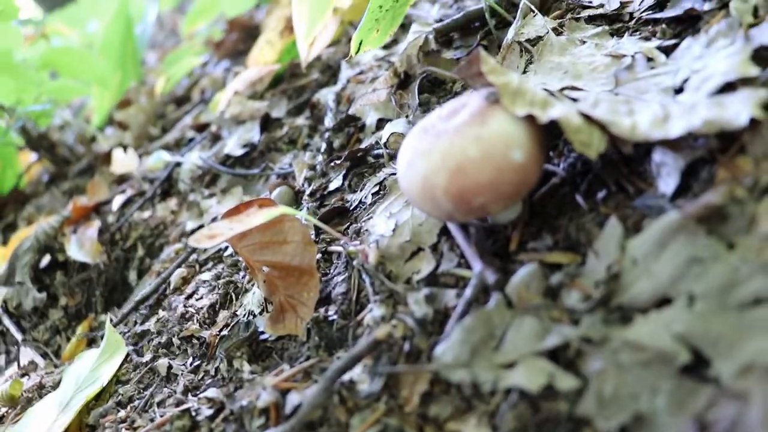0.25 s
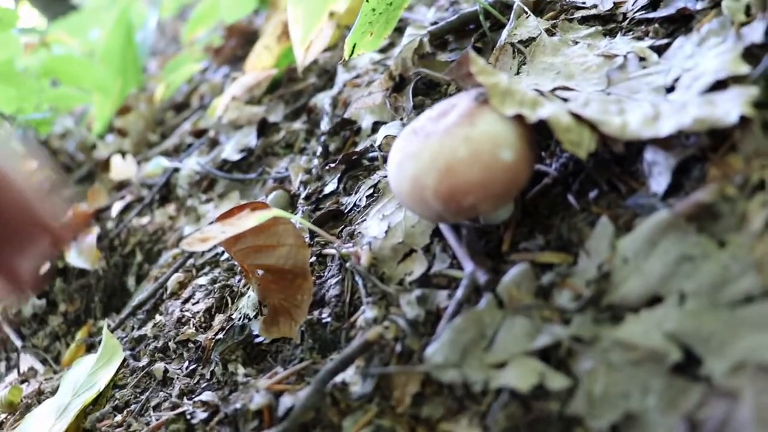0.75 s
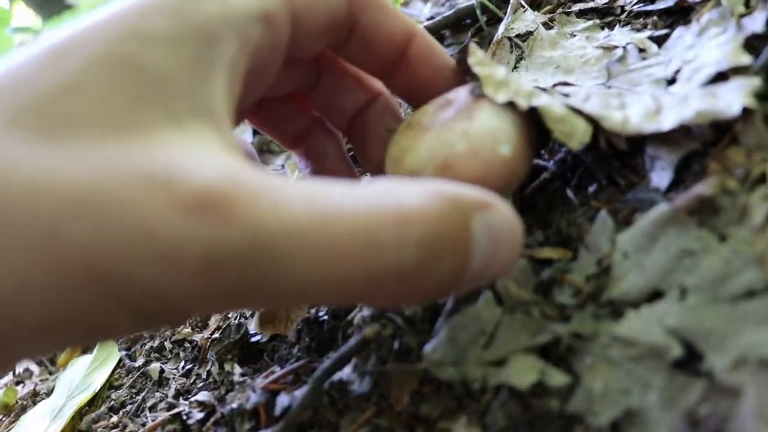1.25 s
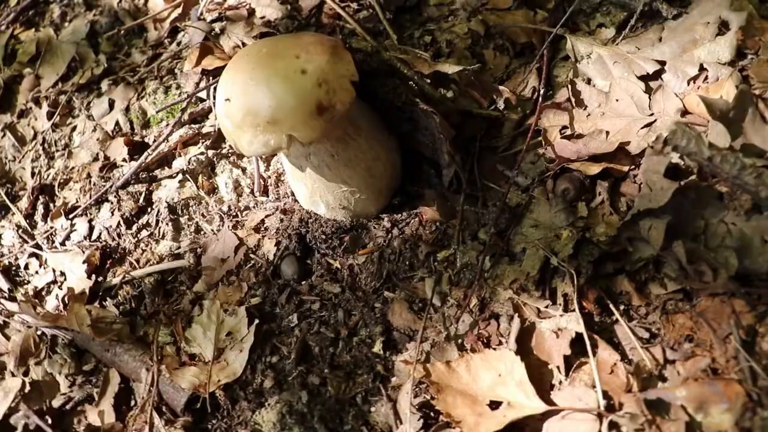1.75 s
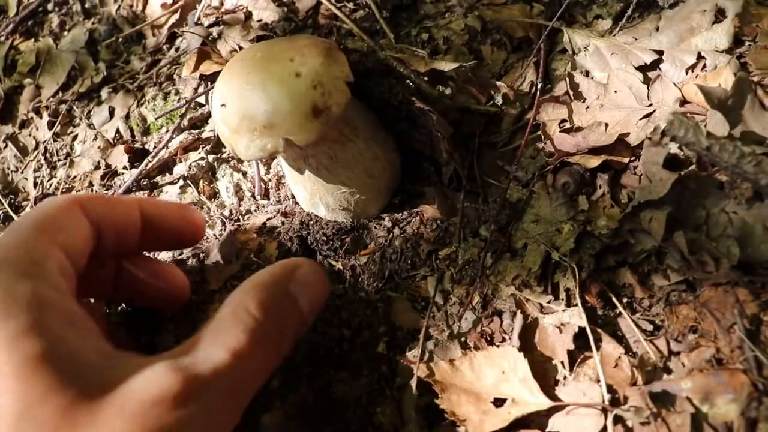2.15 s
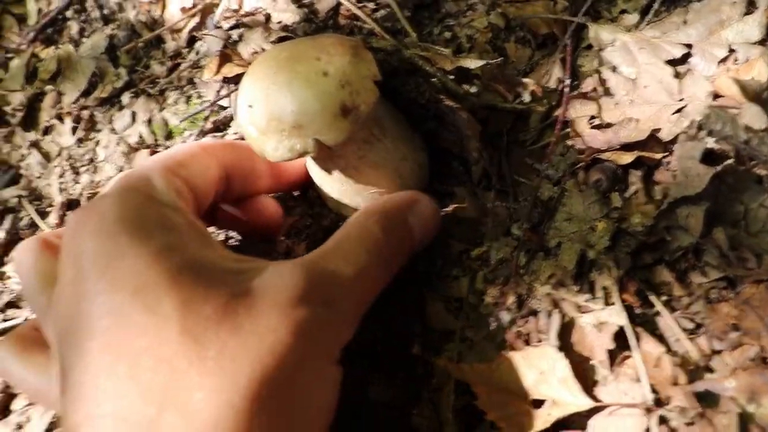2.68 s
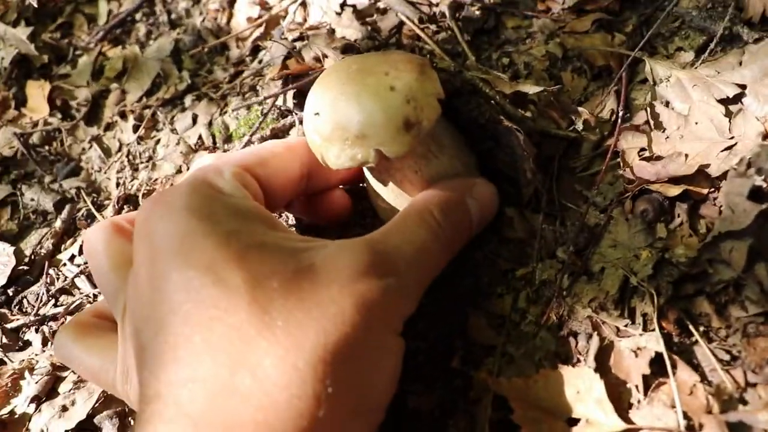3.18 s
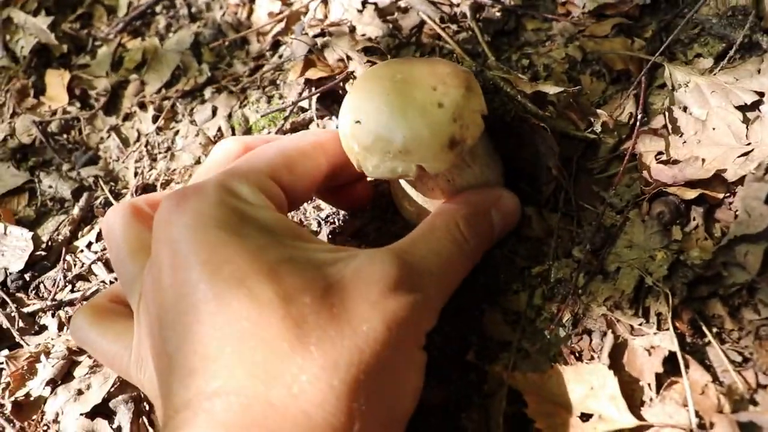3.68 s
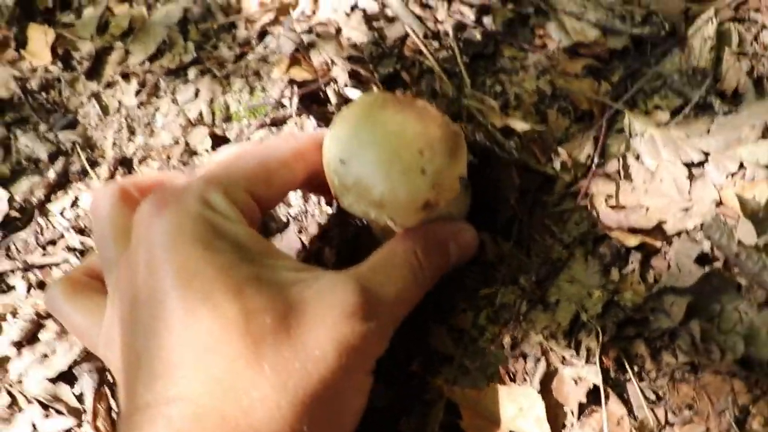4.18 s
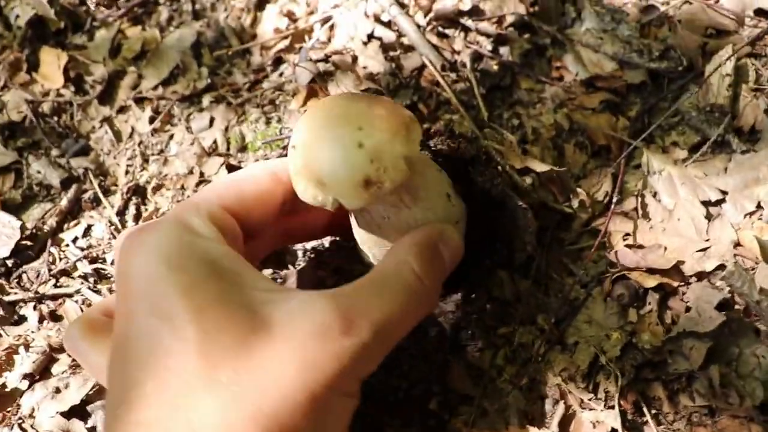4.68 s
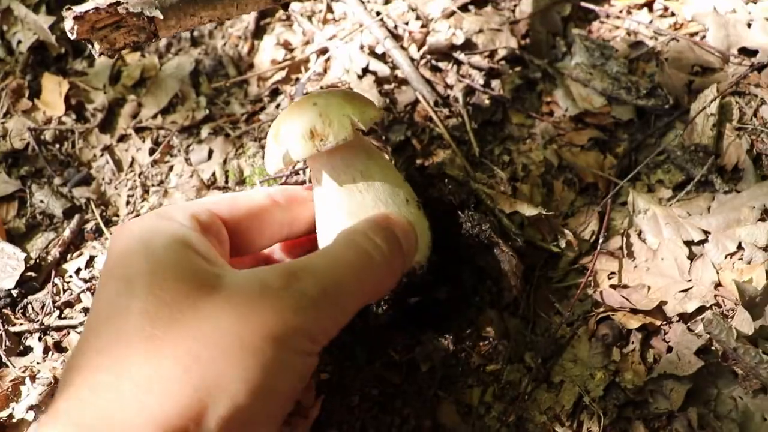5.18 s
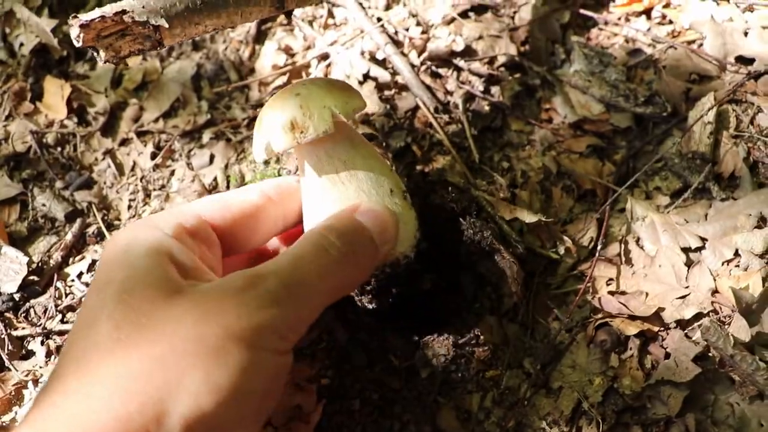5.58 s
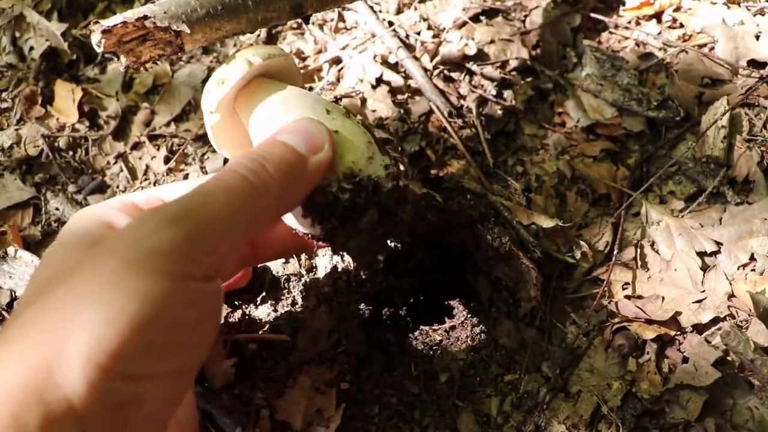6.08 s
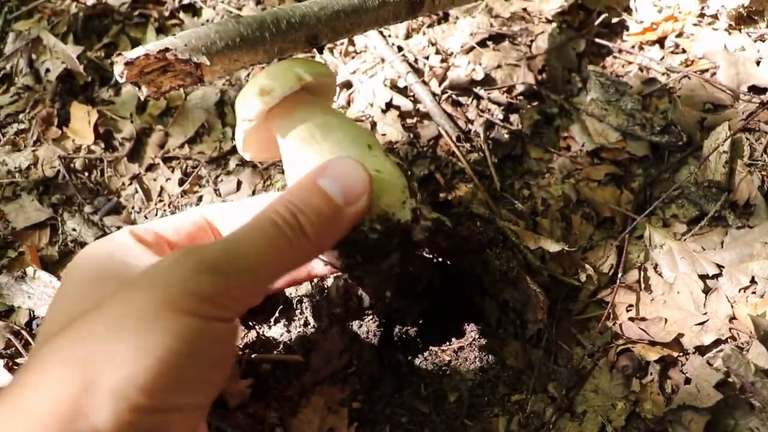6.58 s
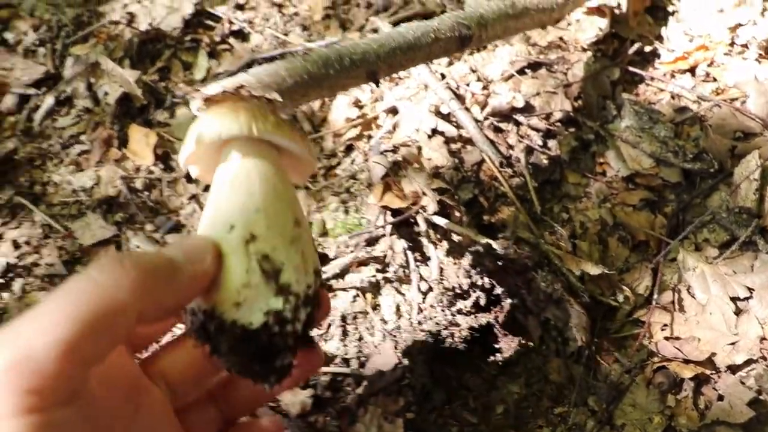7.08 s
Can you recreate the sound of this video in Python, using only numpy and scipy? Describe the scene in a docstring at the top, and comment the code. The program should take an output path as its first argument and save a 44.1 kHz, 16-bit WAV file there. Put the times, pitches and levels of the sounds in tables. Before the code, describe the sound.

Dry leaves and small twigs crackle unevenly, close to a stereo microphone, as fingers work a mushroom out of the forest floor. Bright snaps come singly and in clusters, mixed with crinkling, short leaf scrapes and muffled taps of crumbling soil. The handling grows lighter toward the end. Underneath lie steady, soft woodland air and a faint low rumble.

```python
"""Dry leaves and twigs crack one by one as a hand digs into the litter and pulls up a mushroom, close by.
Each crack is a spray of tiny fractures: a bright snap, a lower ring and a little body. The fingers drag
up a dense crinkle, leaves slide with a hiss and stop short, soil and stem knock dully.
Behind it lie a low rumble, a quiet wood and the hiss of the stereo microphones."""
import sys
import numpy as np
from scipy import signal
from scipy.fft import rfft, irfft
from scipy.io import wavfile
from scipy.ndimage import uniform_filter1d

SR = 44100
rng = np.random.default_rng(int(sys.argv[2]) if len(sys.argv) > 2 else 0)


def bounce(signal):
    """Save signal as a 16-bit WAV file at the path given by the first command-line argument."""
    frames = np.transpose(np.atleast_2d(signal))
    limited = np.clip(frames, -1, 1)
    pcm = np.round(limited * 32767).astype(np.int16)
    wavfile.write(sys.argv[1], SR, pcm)


N = 323694

# how hard the fingers drag: t/s, dry leaves/dB, damp soil/dB, pan (left minus right)/dB
FINGER_DRAG = [(0.0, -50.5, -47, 2), (0.18, -52.5, -52.5, 5), (0.39, -55.5, -62, -2), (0.57, -54, -53.5, 4),
               (0.71, -49.5, -51.5, -3), (0.88, -56.5, -56, 3), (1.1, -58, -58, 1), (1.59, -48.5, -60, -3),
               (1.84, -54.5, -53, 0.1), (2.08, -56, -52.5, -0.5), (2.47, -49, -52, -1.2),
               (2.88, -56, -52, -2.5), (3.07, -53.5, -51.5, -3), (3.43, -59, -59.5, 0.1),
               (3.72, -57, -54, -3), (3.93, -56, -52.5, -3), (4.09, -59, -60, 0.1), (4.7, -52, -56.5, -1),
               (5.36, -61.5, -63.5, -1), (5.56, -61, -69, -2), (5.74, -55, -60.5, 1),
               (6.19, -60, -63.5, -2), (6.52, -57, -59, -2), (6.77, -58, -58.5, -1),
               (6.95, -62.5, -65, 0.1), (7.34, -63, -60, 0.1)]


def cracks(snap_hz=9130, snap_scatter=0.06):
    """A leaf splits in a spray of tiny fractures: a bright snap, a lower ring and a little body."""
    # t/s, snap peak/dB, ring re snap/dB, ring f/Hz, body re snap/dB, spray time scale/ms, pan/dB
    loud_cracks = [(0.1111, -13, -6.5, 3440, -25, 0.42, 8), (0.1198, -15.5, -13.5, 3560, -14, 1.9, 2),
                   (0.137, -31, 6, 4150, 0, 7.1, -5), (0.3083, -35, -1, 3240, -9, 2.3, 8),
                   (0.3676, -25, -8, 3470, -14, 2.1, 3.5), (0.411, -12.5, 0.5, 4390, -11.5, 1.26, 4),
                   (0.508, -17, -12, 3170, -20, 1.3, 8), (0.6618, -23, -8, 3500, -24, 1.8, 7),
                   (0.6827, -23, -20.5, 4470, -18, 3.4, 7), (0.6929, -30, -20, 4580, -22, 4.2, -1),
                   (0.7386, -23.5, -21, 4620, -34, 6.5, 6.5), (0.8005, -23, -14.5, 3720, -31, 2.6, 8),
                   (0.8466, -24.5, -3.5, 4140, -12.5, 1.5, 6.5), (0.982, -29, 6, 3160, -10, .84, 8),
                   (1.0913, -16.5, -9.5, 3650, -28, 1.84, 7.5), (1.2141, -35, -11, 3100, -22, 3.1, 4.5),
                   (1.269, -29, -12, 3490, -17, 0.74, -12), (1.3292, -18.5, -18, 3180, -28, 2.5, -5.5),
                   (1.35, -30, -3, 2860, -18, 1.9, -9), (1.384, -28.5, -6.5, 4520, -18, 4.1, 1),
                   (1.393, -26, -11, 4230, -11, 1.4, -6), (1.4347, -27.5, -25, 3940, -22, 7.3, -1),
                   (1.442, -27.5, -7, 5000, -10, 7.3, 2.5), (1.7507, -24.5, -13, 3800, -26, 7.1, -6),
                   (1.804, -25.5, -8.5, 3250, -14, 7.3, -3), (1.9259, -29, -20, 4290, -8, .6, 3),
                   (2.06, -30, -6, 4820, -7.5, 1.8, -1), (2.0005, -35, -9, 4850, -19.5, 1.1, 6),
                   (2.1138, -31, -7, 4830, -12, 1.8, 4), (2.257, -21, -12, 4540, -12, 1.7, 4),
                   (2.2657, -25.5, 0, 4030, -7, 1.2, 1), (2.296, -17, 0.5, 4580, -14, 0.87, 1),
                   (2.312, -26, -3, 2190, -27, 1.6, -1.5), (2.3464, -31, -21, 3070, -23, .9, 2),
                   (2.3701, -24.5, -9, 2520, -32, 0.24, 2), (2.3956, -21.5, -16, 2050, -19, .73, 4),
                   (2.4464, -26.5, -25, 3130, -13, 1.7, 5.5), (2.529, -29, -23, 2130, -15, 4.9, 6),
                   (2.5935, -22, -17, 2630, -5, 1.3, -2), (2.628, -14.5, -19, 3020, -20, 0.18, 10),
                   (2.836, -27, -16, 2580, -23, 1.1, 7.5), (2.8815, -17.5, -23, 2760, -15, 0.43, 7),
                   (2.8661, -30, -16, 2810, -20, .6, 7.5), (2.8907, -21, -7, 3410, -10, 0.36, 1),
                   (2.8982, -12, -8.5, 2980, -3.5, 0.45, 1), (2.9068, -21, -14, 2600, -25, 1.5, 6),
                   (2.91, -15.5, -16, 2310, -34, 0.78, 3.5), (2.9784, -15.5, -7.5, 2160, -30, 0.34, 6.5),
                   (3.045, -29, -19, 3050, -10, 0.41, 7), (3.1403, -25, 0.5, 2780, -4, 1, 2),
                   (3.1479, -15.5, -8.5, 2650, -13.5, 2.44, -2), (3.1504, -24.5, -8, 4400, -9, 14, -1),
                   (3.1706, -18.5, -6, 3950, -10, .38, -0.5), (3.2226, -26, -5.5, 3800, -11, 1.8, -1),
                   (3.2337, -23, -24, 3470, -12.5, 0.5, -0.5), (3.2586, -29.5, -25, 3430, -14, 0.44, 11.5),
                   (3.402, -36, -21, 2340, -13, 0.36, -4), (3.551, -26, -2, 2400, -7, 0.42, 1.5),
                   (3.667, -24.5, -15, 2010, -25, 1.1, 8), (3.7872, -28.5, -4.5, 2930, -4, 0.78, 2),
                   (3.8927, -20.5, -1.5, 3120, -2, 0.87, -2.5), (4.0263, -29, -5, 2400, -1.5, 1.9, -2.5),
                   (4.0464, -19.5, 0, 2660, -14, 0.18, -2.5), (4.0767, -27, -8.5, 1870, -12, 1.3, -1.5),
                   (4.3014, -29, -6, 3260, -8, 0.98, 12.5), (4.3793, -28.5, -2.5, 2680, -15, 1.3, 0),
                   (4.4525, -26.5, -32, 3350, -25, 0.37, 10), (4.4932, -25, -23, 2600, -16, .28, 8),
                   (4.5063, -27.5, -26, 4500, -19, .4, -2), (4.5649, -28, -20, 3760, -25, .26, 10),
                   (4.5816, -21, -27, 4100, -11.5, 0.49, 6.5), (4.5995, -27, -17, 2270, -23, .4, 5.5),
                   (4.6306, -21.5, -2.5, 3360, -15, 0.42, -1), (4.6572, -24, -8, 2800, -12, 0.88, 3),
                   (4.809, -25, -18, 4400, -12, 5.5, 10), (4.8244, -25, -4, 3720, -4, 0.39, -9),
                   (4.8439, -29, 0, 2110, -6, 0.4, 1), (4.894, -26, -11, 3350, -26.5, .44, -5),
                   (4.9172, -36, -20, 3110, -27, .58, 8), (4.992, -20.5, -4, 3300, -2.5, 2.4, -4.5),
                   (5.0644, -25.5, -14.5, 4370, -21, 0.74, 3), (5.1466, -35.5, -1, 2670, -0.5, 2.8, 2),
                   (5.1787, -25.5, -3.5, 3000, -20, 0.34, 6.5), (5.2093, -27, -18, 3260, -30, 0.27, 10),
                   (5.288, -27.5, -3, 2770, -27, 0.92, 3.5), (5.502, -22, -8.5, 3650, -30, 3.7, 3.5),
                   (5.552, -13.5, -26, 3400, -30, 0.27, 1), (5.578, -24.5, -17, 3260, -28, 1.5, 6),
                   (5.683, -27, -9, 3320, -12, .25, 3.5), (5.7119, -28.5, -10, 2570, -6, 0.26, 0.5),
                   (5.7337, -8, -6, 2220, -12, .34, -2), (5.7772, -33.5, 1.5, 3060, -11, .3, -2),
                   (5.7996, -22.5, -7, 3610, -30, 0.2, 14), (5.816, -12, -12, 3300, -37, 0.24, -9.5),
                   (5.8264, -24.5, -6, 3650, -20, 1.9, 5), (5.884, -32, -3, 2560, -17, 0.74, 1.5),
                   (5.9217, -36.5, -8, 2370, -3, 2.2, 3.5), (6.0012, -25, -20, 3600, -30, 0.93, 6.5),
                   (6.0057, -19.5, -6, 3700, -31, 0.45, 7.5), (6.0178, -23, -11, 2740, -31, 0.38, 6.5),
                   (6.0542, -29, -23, 3060, -16, .7, 6), (6.0844, -33, -10, 3270, -24, .74, -3),
                   (6.2129, -29.5, -12, 3720, -24, .53, 6.5), (6.3627, -28, 0, 3430, -12, 1.15, 3),
                   (6.3811, -26, -9, 4180, -13, 1.3, 4.5), (6.3944, -29, -2, 3480, -19, 1.6, -4.5),
                   (6.4244, -17, -7, 2640, -13.5, 0.2, 1.5), (6.5448, -23, -3.5, 3100, -14, 1.1, 4),
                   (6.5803, -32, 2, 2920, -6, 0.66, 2.5), (6.6139, -26, -19, 3740, -25, 0.23, 8),
                   (6.635, -34, -2, 3000, -8.5, 5, -0.5), (6.824, -23, -8, 4120, -14.5, 0.31, -0.5),
                   (6.8406, -28.5, -20, 4850, -22.5, 4.4, 3), (7.141, -26, -4.5, 3620, -16, 0.96, 1),
                   (7.2918, -31.5, -7.5, 3620, -14, 1.5, -1.5)]
    rows = np.vstack([loud_cracks, small_cracks()])
    out, t = np.zeros((2, N)), np.arange(1024) / SR
    noise = stereo_noise(0.75, (len(rows), len(t)))
    spikes_db = 1.22 * rng.exponential(size=(len(rows), len(t)))
    snaps_hz = snap_hz * np.exp(snap_scatter * rng.standard_normal(len(rows)))
    spray_s = np.maximum(rows[:, 5:6], 0.2) / 1000
    spray = (1 - np.exp(-t / (0.5 * spray_s))) * np.exp(-t / (0.78 * spray_s)) * undb(spikes_db)
    shiver = 0.035 * np.exp(-t / 0.006)  # the leaf trembles on faintly
    split = noise * (spray + shiver)
    body = unit_peak(band(split, 544, 2570))
    for k, (start, db, ring_db, ring_hz, body_db, _, pan_db) in enumerate(rows):
        snap = unit_peak(band(split[:, k], snaps_hz[k] * 0.66, snaps_hz[k] * 1.17, order=1))
        ring = unit_peak(band(split[:, k], ring_hz * 0.7, ring_hz * 1.44))
        crack = snap + undb(ring_db) * ring + undb(body_db) * body[:, k]
        place(out, start, undb(db) * crack, pan_db)
    return out


def small_cracks(count=75, gathering=0.9):
    """Rows for the lesser cracks, which fall by chance and gather where the leaves rustle loudest."""
    # mean, spread of: snap peak/dB, ring re snap/dB, ring f/Hz, body re snap/dB, spray scale/ms, pan/dB
    typical_crack = [(-32.5, 3.4), (-13, 3.1), (3200, 760), (-20.5, 4), (0.93, 0.61), (1.5, 4.5)]
    mean, spread = np.transpose(typical_crack)
    voicing = mean + spread * np.clip(rng.standard_normal((count, len(mean))), -2, 2)
    t = np.arange(0, N / SR - 0.03, 0.001)
    leaves_db = np.interp(t, *np.transpose(FINGER_DRAG)[:2])
    activity = np.cumsum(undb(gathering * leaves_db))
    starts = np.interp(rng.random(count), activity / activity[-1], t)
    return np.column_stack([starts, voicing])


def finger_drag():
    """Fine leaves crinkle on top, coarse ones lower, soil crumbles lowest; they share some splits."""
    # fine leaves, coarse leaves, soil: split rate/(1/s), tail/s, left-right correlation
    grains = [(1310, 0.00068, 1), (805.5, 0.0053, 0.03), (500, 0.0035, 0.62)]
    times, *curves = np.transpose(FINGER_DRAG)
    fine_db, soil_db, pan_db = (np.interp(np.arange(N) / SR, times, curve) for curve in curves)
    coarse_db = fine_db + 0.24 * (soil_db - fine_db)
    shared = crinkle(350, scatter_db=4.1, tail_s=0.0014, patchy_db=3.05, correlation=0.4)
    fine, coarse, soil = (shared + 1.12 * crinkle(rate, 2.76, tail_s, 3.0, correlation)
                          for rate, tail_s, correlation in grains)
    # leaves of different size take turns, so the colour of the crinkle wanders
    bands_hz = (5900, 8200), (8000, 10200), (10600, 11400)
    fine = unit_rms(sum(band(fine, lo, hi, order=1) * undb(3.0 * wander(15)) for lo, hi in bands_hz))
    coarse = unit_rms(band(coarse, 1520, 4460))
    soil = unit_rms(band(soil, 315, 1630))
    rustle = undb(fine_db) * fine + undb(coarse_db) * coarse + undb(soil_db) * soil
    return rustle * undb(np.array([pan_db, -pan_db]) / 2)


def crinkle(per_second, scatter_db, tail_s, patchy_db, correlation):
    """Tiny splits of very uneven size, each with a short noisy tail, coming in patches; rms 1."""
    fires = rng.random(N) < per_second / SR
    splits = fires * undb(scatter_db * np.minimum(rng.exponential(size=N), 4))
    energy = signal.lfilter([1], [1, -np.exp(-1 / (tail_s * SR))], splits ** 2)
    patches = undb(patchy_db * wander(40))
    return unit_rms(np.sqrt(energy) * patches * stereo_noise(correlation, (N,)))


def leaf_slides(scrape_db=-7, colour_db=2.1):
    """A leaf slides over skin or soil and stops short: jerky friction so dense that it hisses."""
    # start/s, stop/s, first level/dB, last level/dB, hiss f/Hz, pan/dB
    strokes = [(.6, 0.728, -44.5, -39, 8900, 5), (0.737, 0.878, -38.5, -42, 8500, 4.5),
               (1.321, 1.404, -40, -51, 8040, -5), (1.407, 1.533, -44.5, -47, 8800, -5),
               (1.576, 1.66, -59, -41, 5950, 0), (1.706, 1.842, -43, -43.5, 8400, -3),
               (2.243, 2.447, -44, -61, 10700, 1.5), (2.58, 2.704, -46.5, -43, 10600, 6),
               (3.12, 3.182, -45, -39, 9050, 2), (4.795, 4.873, -45, -52, 9000, 4),
               (6.363, 6.473, -46.5, -50, 7600, 1.5), (6.635, 6.697, -51, -69, 7000, 2),
               (6.751, 6.812, -45, -57, 10700, -3), (0.027, 0.177, -47, -46, 900, 3.5),
               (4.552, 4.6, -48, -44, 9500, 2), (5.864, 5.964, -52, -55, 9000, 1),
               (0, 0.288, -53, -50, 8300, 1), (6.834, 6.92, -54, -43.5, 9100, -2)]
    out = np.zeros((2, N))
    friction = crinkle(1300, scatter_db=1.8, tail_s=0.0037, patchy_db=1.9, correlation=0.38)
    tilt = undb(colour_db * wander(25))  # see-saws the hiss between darker and brighter
    for start, stop, first_db, last_db, hz, pan_db in strokes:
        span = slice(int(start * SR), int(stop * SR))
        rub = friction[:, span]
        t = np.arange(rub.shape[1]) / SR
        dark = band(rub, hz * 0.63, hz * 1.154) * tilt[span]
        bright = band(rub, hz * 1.08, hz * 1.22, order=1) / tilt[span]
        scrape = undb(scrape_db) * unit_rms(band(rub, hz * 0.22, hz * 0.51))
        fades = np.minimum(np.minimum(t / 0.0029, (t[-1] - t) / 0.0013), 1)
        ramp = undb(first_db + (last_db - first_db) * t / t[-1])
        place(out, start, (unit_rms(dark + bright) + scrape) * fades * ramp, pan_db)
    return out


def soil_knocks(sag_s=0.00058, attack_s=0.00011):
    """A soft push on soil or stem sets off a few dull cycles that sag in pitch, with a crumble of soil."""
    # t/s, peak level/dB, f/Hz, decay t60/s, pan/dB
    pushes = [(0.0374, -35, 364, 0.019, -3.5), (0.1383, -25, 720, 0.02, 9.5),
              (0.2034, -32.5, 1240, 0.024, 5), (0.4112, -30.5, 840, 0.02, -6),
              (0.4842, -30, 1060, 0.02, 11), (0.6822, -38, 340, 0.035, -3), (0.8473, -41.5, 710, 0.025, -3),
              (1.33, -34.5, 1770, 0.032, 3.5), (2.2662, -35, 513, 0.027, -1), (2.3067, -44.5, 690, 0.03, 4),
              (2.4533, -30.5, 1150, 0.04, 1), (2.5614, -37.5, 1270, 0.036, 5),
              (2.6107, -33, 1110, 0.042, 1), (2.8991, -33, 1190, 0.025, 6), (2.979, -42, 1740, 0.018, -1),
              (3.0405, -40, 800, 0.022, 1), (3.1489, -29, 770, 0.014, -4), (3.5166, -41.5, 810, 0.035, 1),
              (3.621, -45, 810, 0.023, 2), (3.7365, -33, 1050, 0.03, -3), (3.763, -42, 1060, 0.023, -2),
              (3.8043, -27, 1020, 0.025, -4.5), (3.8945, -28.5, 1037, 0.037, 4),
              (3.9447, -35, 1040, 0.019, -2), (3.9658, -38.5, 387, 0.018, -20),
              (4.0238, -28.5, 1110, 0.039, -3), (4.0392, -36.5, 370, 0.027, -0.5),
              (4.108, -45, 707, 0.03, -3), (4.381, -35.5, 1070, 0.024, -4), (4.4927, -47, 1200, 0.0214, -5),
              (4.629, -40.5, 550, 0.081, -2), (4.9932, -30, 1038, 0.03, -1), (5.1459, -40, 1450, 0.033, -5),
              (5.3356, -35, 354, 0.03, -16), (5.4157, -45, 390, 0.027, -11.5),
              (5.5027, -42, 1330, 0.041, 0), (5.7342, -20, 1010, 0.024, 1), (5.7358, -29, 549, 0.037, -2),
              (6.4836, -47.5, 390, 0.033, -20), (6.7425, -47, 533, 0.034, -2)]
    out, t = np.zeros((2, N)), np.arange(2048) / SR
    grit = stereo_noise(0.92, (len(pushes), len(t)))
    for k, (start, db, hz, t60, pan_db) in enumerate(pushes):
        phase = 2 * np.pi * hz * (t + 0.000338 * (1 - np.exp(-t / sag_s)))
        tone = np.sin(phase) + 0.34 * np.sin(0.557 * phase)
        crumble = 0.68 * unit_rms(band(grit[:, k], hz * 0.29, hz * 1.6))
        envelope = (1 - np.exp(-t / attack_s)) * undb(-60 * t / t60)
        place(out, start - 0.0004, undb(db) * unit_peak((tone + crumble) * envelope), pan_db)
    return out


def rumble(swell_at_s=3.29, swell_db=10, swell_fade_s=0.035):
    """A low wavering rumble, a little to the left, stronger early on and with one brief swell."""
    # t/s, level/dB
    contour = [(0, -53), (1.8, -55), (1.95, -61.5), (7.34, -62)]
    t = np.arange(N) / SR
    low = unit_rms(band(stereo_noise(0.71, (N,)), 35.6, 129.0)) * undb([[0.6], [-0.6]])
    level_db = np.interp(t, *np.transpose(contour)) + 1.3 * wander(8)
    swell = np.exp(-np.abs(t - swell_at_s) / swell_fade_s)
    return low * undb(level_db + swell_db * swell)


def quiet_wood(level_db=-55.5):
    """A steady bed of woodland air and microphone hiss, widest in the mids and narrowest in the bass."""
    # f/Hz, relative spectral density/dB
    colour = [(88, -23.5), (150, 7.5), (376, 7.5), (774, -2.5), (1340, 1), (3220, -12.5), (5050, -14),
              (6640, -5), (10200, -6.5), (15100, -12.5), (16000, -37)]
    # f/Hz, left-right correlation
    stereo_image = [(60, 0.56), (300, 0.4), (1400, 0.089), (3000, 0.056), (7000, 0.088), (15000, 0.43)]
    hz = np.fft.rfftfreq(N, 1 / SR)
    correlation = over_frequency(stereo_image, hz)
    mid, side = rfft(rng.standard_normal((2, N)))
    mid, side = mid * np.sqrt(1 + correlation), side * np.sqrt(1 - correlation)
    spectrum = np.array([mid + side, mid - side]) * undb(over_frequency(colour, hz))
    return undb(level_db) * unit_rms(irfft(spectrum, N))


def place(out, start, sound, pan_db, lag_s_per_db=1 / 70000):
    """Mix in a stereo sound, louder and earlier at the nearer microphone."""
    for ch, sign in enumerate((1, -1)):
        side_db = sign * pan_db / 2
        i = max(int((start - side_db * lag_s_per_db) * SR), 0)
        piece = sound[ch][:N - i]
        out[ch, i:i + len(piece)] += piece * undb(side_db)


def stereo_noise(correlation, shape):
    """Left and right white noise that share a part."""
    mid, side = rng.standard_normal((2,) + shape)
    mid, side = mid * np.sqrt(1 + correlation), side * np.sqrt(1 - correlation)
    return np.array([mid + side, mid - side]) / np.sqrt(2)


def wander(rate_hz):
    """Random values held 1 / rate_hz seconds and slewed; spread near 1."""
    hold = int(SR / rate_hz)
    steps = rng.standard_normal(N // 20)[:N // hold + 1]
    return uniform_filter1d(np.repeat(steps, hold), hold // 2 + 1)[:N]


def over_frequency(points, hz):
    """Curve through (f/Hz, value) points on a log-frequency axis."""
    points_hz, values = np.transpose(points)
    return np.interp(np.log(np.maximum(hz, 1)), np.log(points_hz), values)


def band(x, lo_hz, hi_hz, order=2):
    """Band-pass along time."""
    sos = signal.butter(order, [lo_hz, min(hi_hz, 0.45 * SR)], "band", fs=SR, output="sos")
    return signal.sosfilt(sos, x)


def undb(db):
    """Gain of a level in dB."""
    return 10 ** (np.asarray(db) / 20)


def unit_rms(x):
    """Scaled to rms 1."""
    return x / np.sqrt(np.mean(x ** 2))


def unit_peak(x):
    """Each channel scaled to a peak of 1."""
    return x / np.abs(x).max(axis=-1, keepdims=True)


def scene():
    """The digging hand and its background as they reach the two microphones."""
    return cracks() + soil_knocks() + finger_drag() + leaf_slides() + quiet_wood() + rumble()


def record(dry):
    """The microphones fall away at the top; a steep low-pass cuts the rest."""
    roll_off = signal.ellip(6, 0.5, 16, 15800, fs=SR, output="sos")
    top_cut = signal.ellip(10, 0.2, 70, 16800, fs=SR, output="sos")
    return signal.sosfilt(top_cut, signal.sosfilt(roll_off, dry))


dry = scene()
out = record(dry)
bounce(out)
```